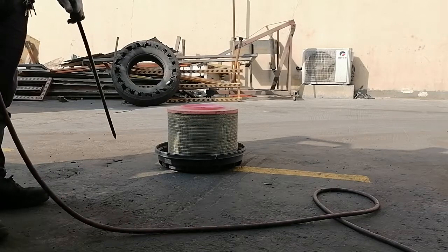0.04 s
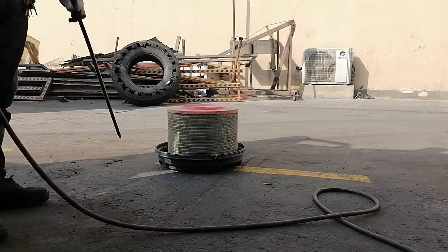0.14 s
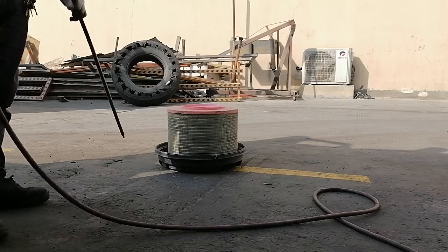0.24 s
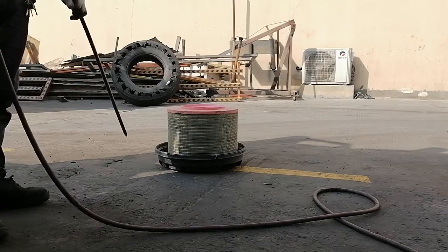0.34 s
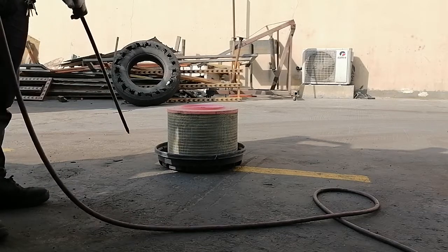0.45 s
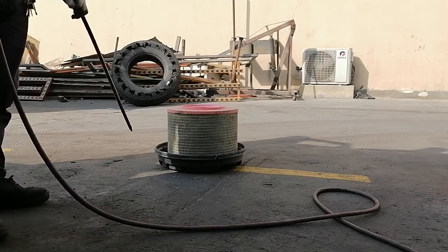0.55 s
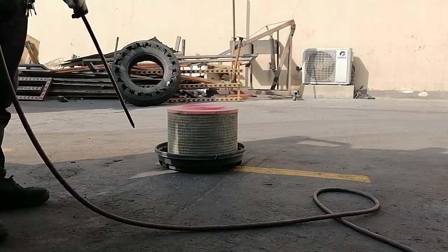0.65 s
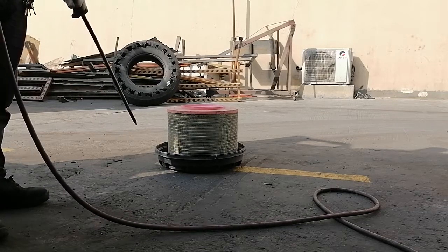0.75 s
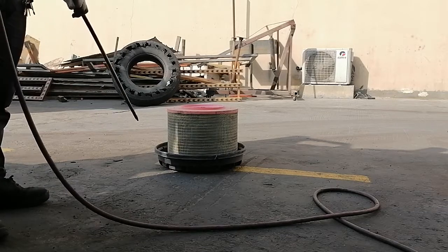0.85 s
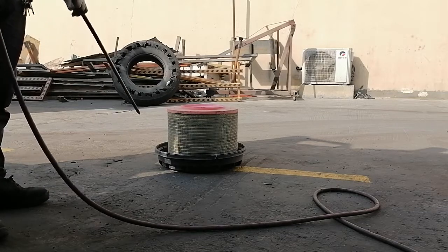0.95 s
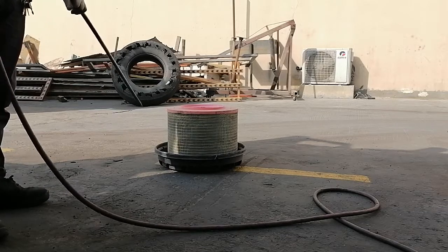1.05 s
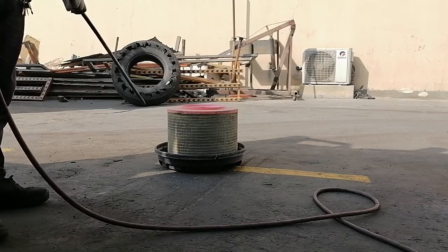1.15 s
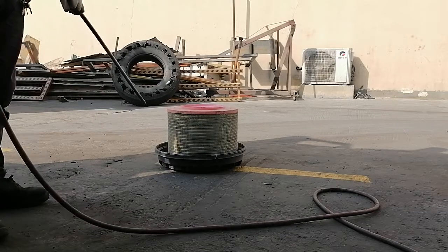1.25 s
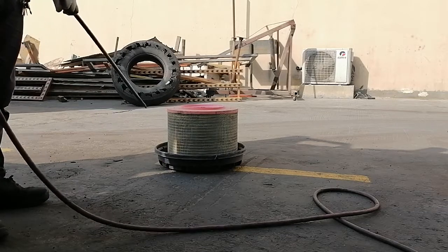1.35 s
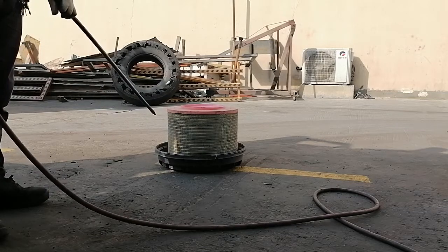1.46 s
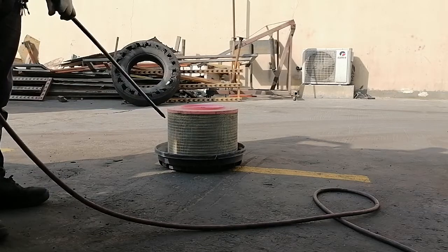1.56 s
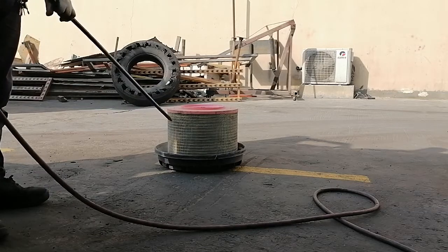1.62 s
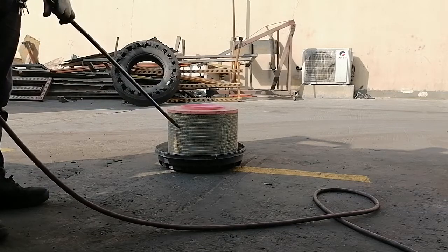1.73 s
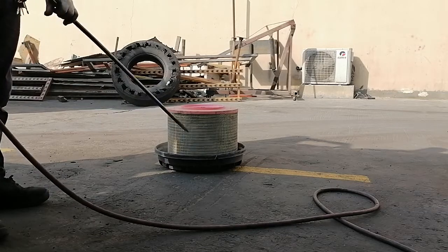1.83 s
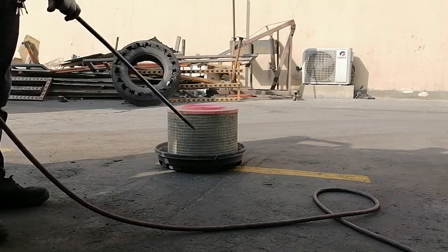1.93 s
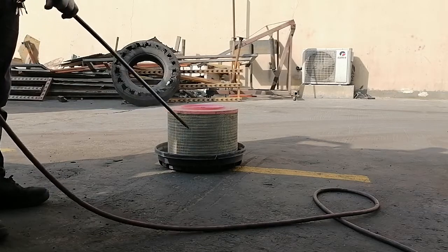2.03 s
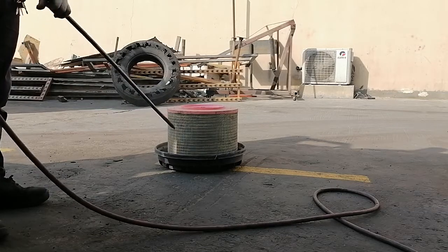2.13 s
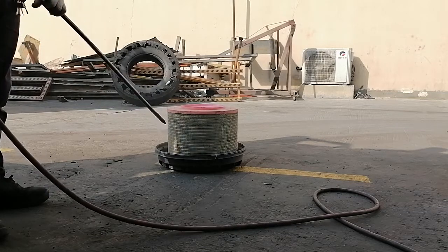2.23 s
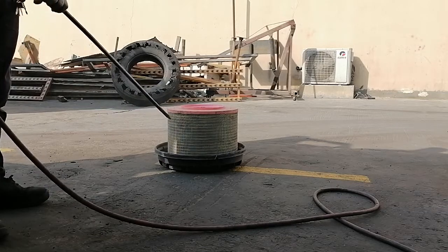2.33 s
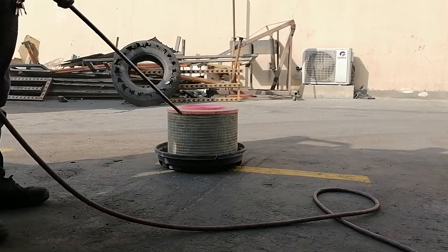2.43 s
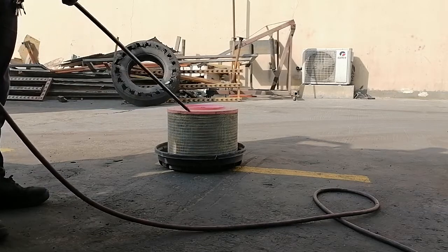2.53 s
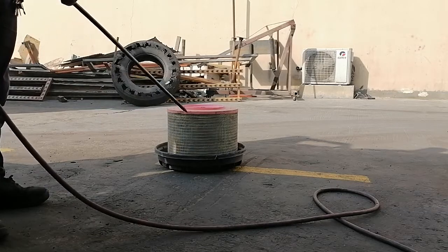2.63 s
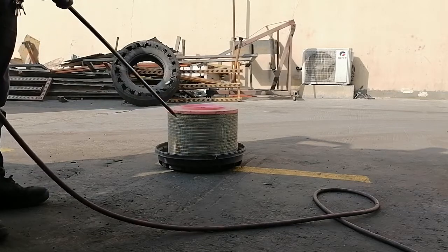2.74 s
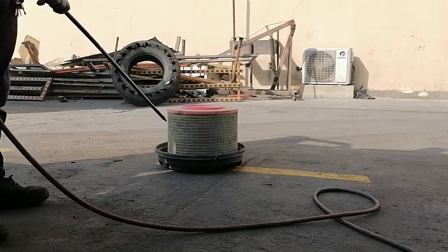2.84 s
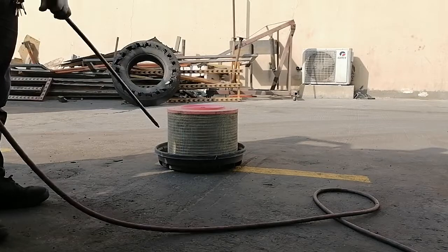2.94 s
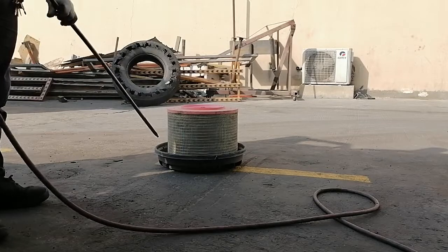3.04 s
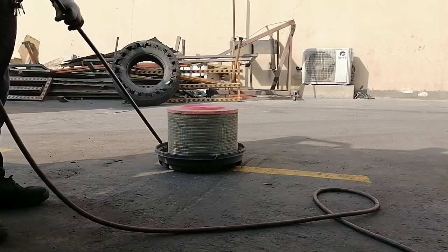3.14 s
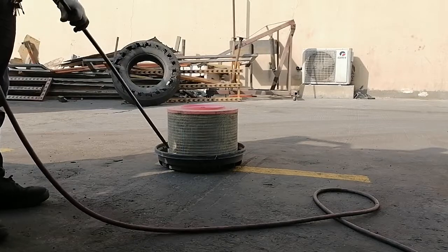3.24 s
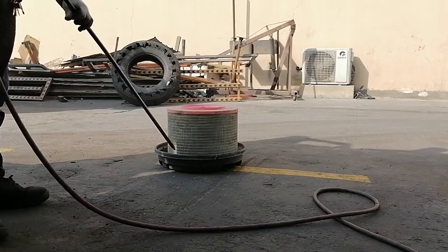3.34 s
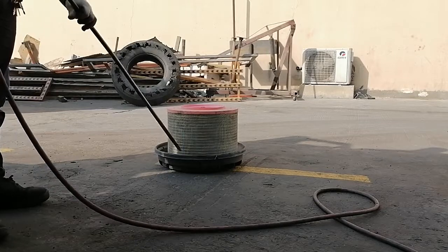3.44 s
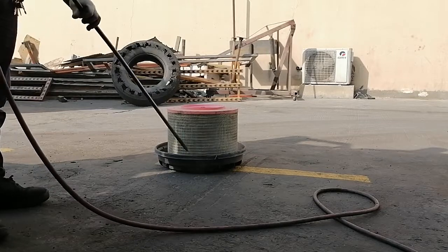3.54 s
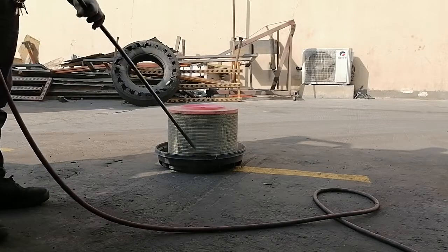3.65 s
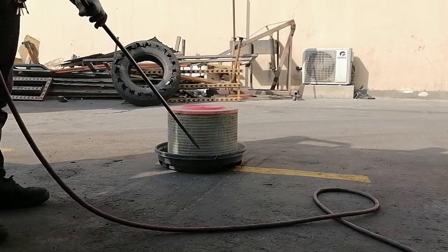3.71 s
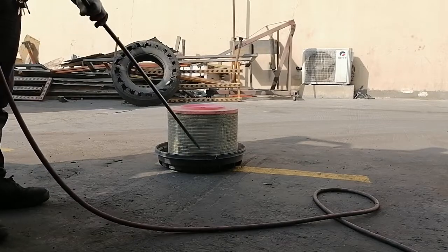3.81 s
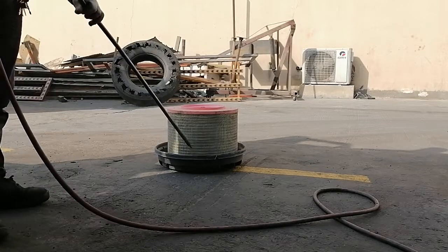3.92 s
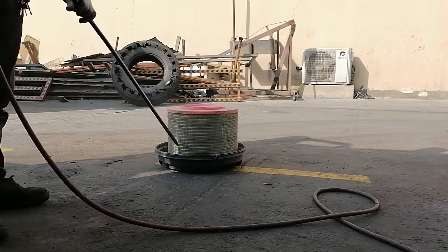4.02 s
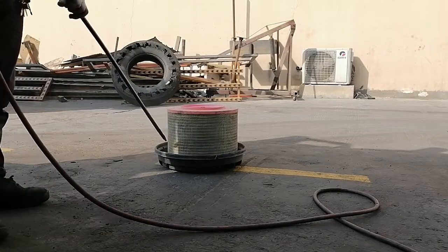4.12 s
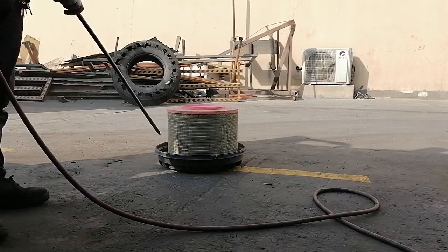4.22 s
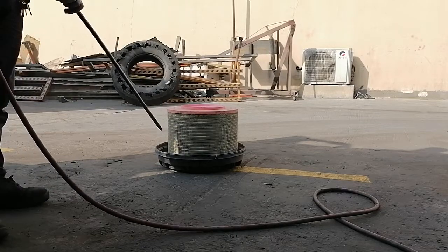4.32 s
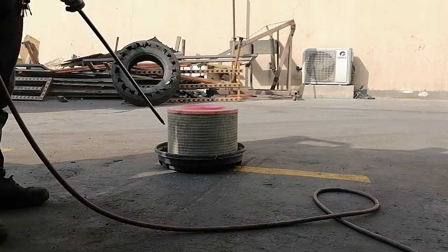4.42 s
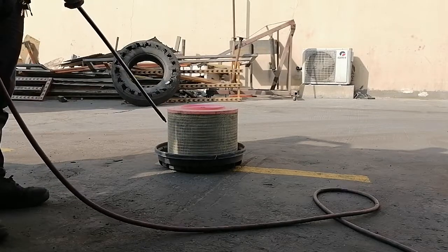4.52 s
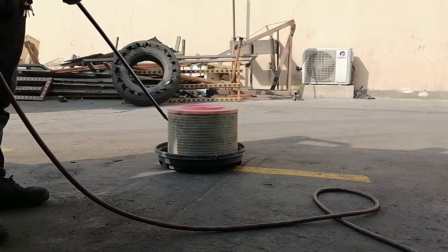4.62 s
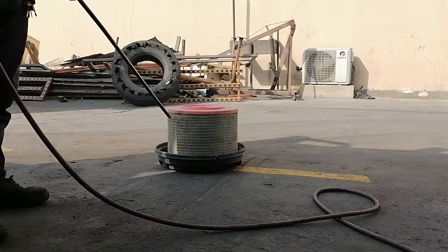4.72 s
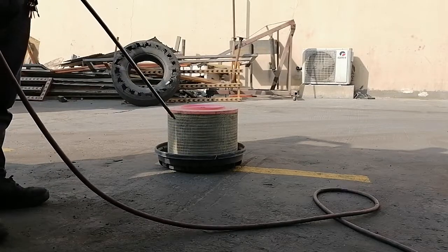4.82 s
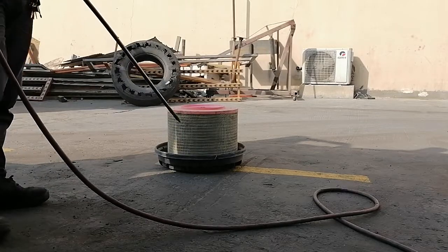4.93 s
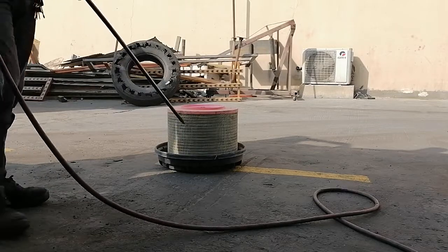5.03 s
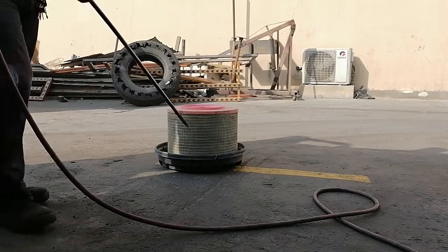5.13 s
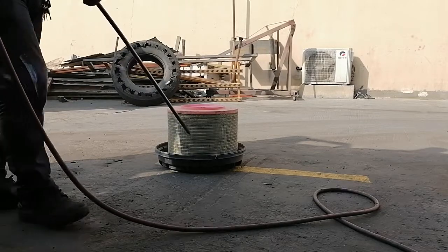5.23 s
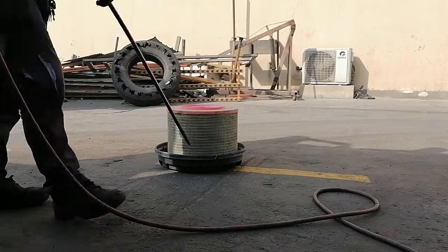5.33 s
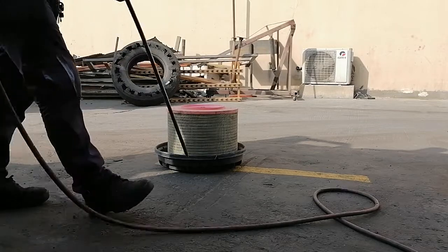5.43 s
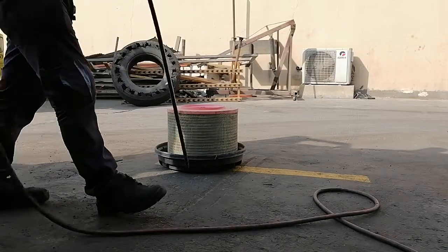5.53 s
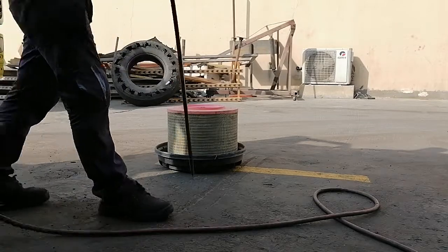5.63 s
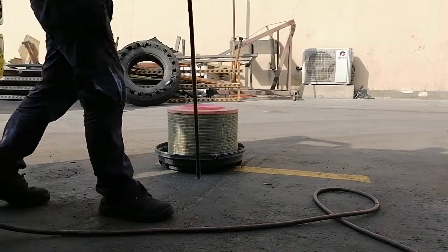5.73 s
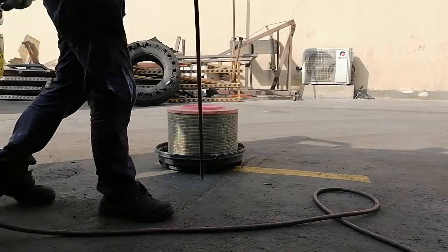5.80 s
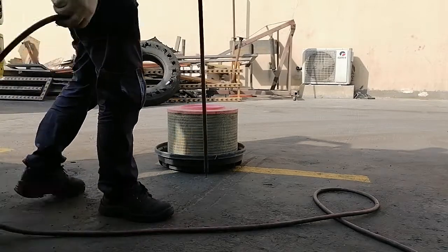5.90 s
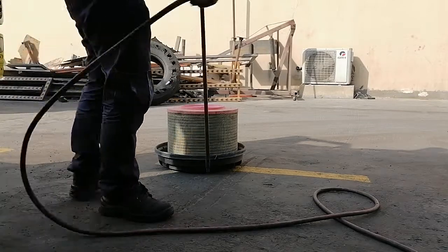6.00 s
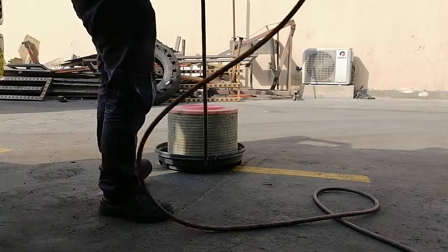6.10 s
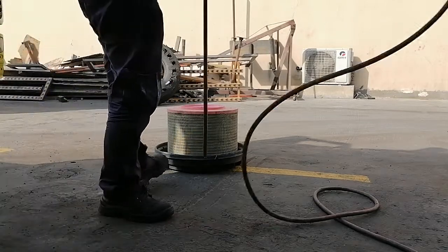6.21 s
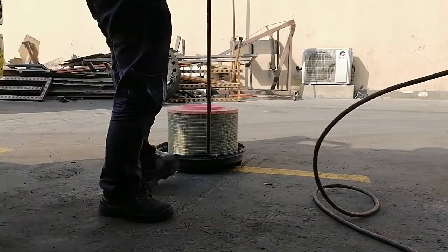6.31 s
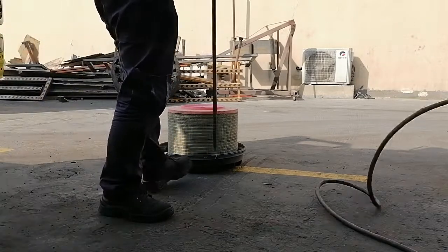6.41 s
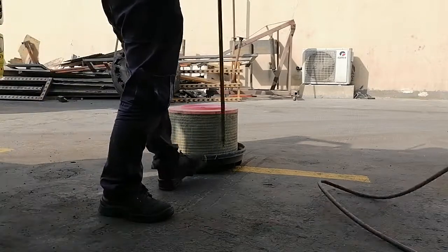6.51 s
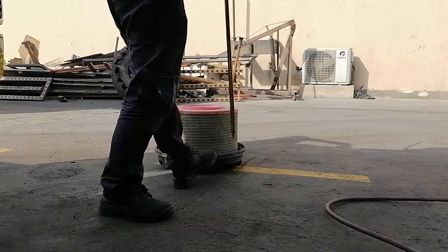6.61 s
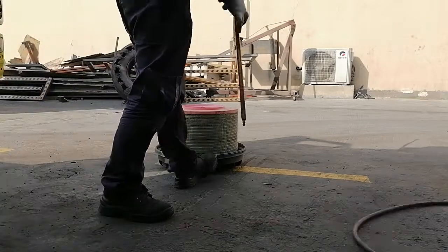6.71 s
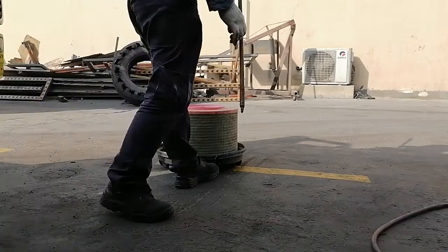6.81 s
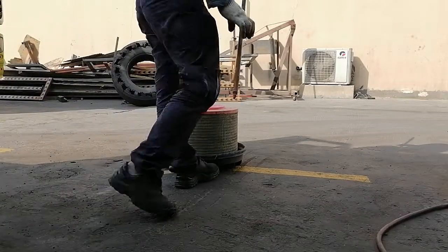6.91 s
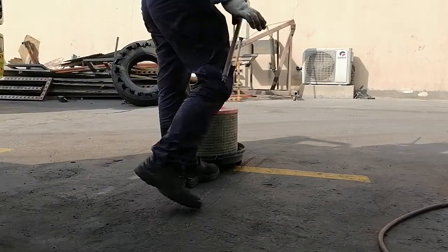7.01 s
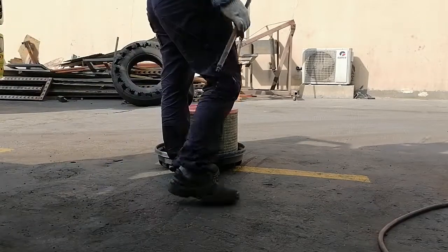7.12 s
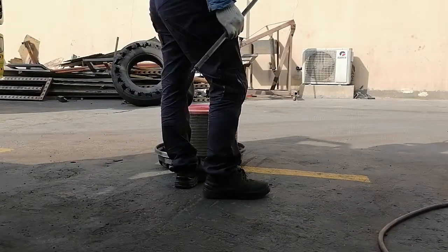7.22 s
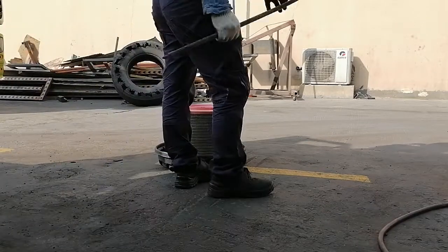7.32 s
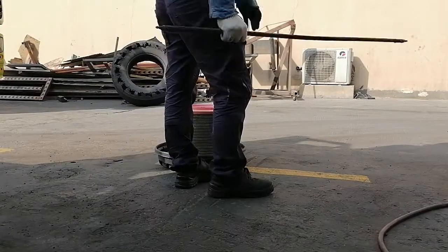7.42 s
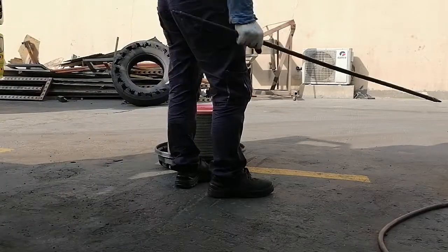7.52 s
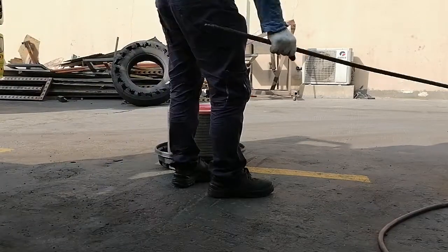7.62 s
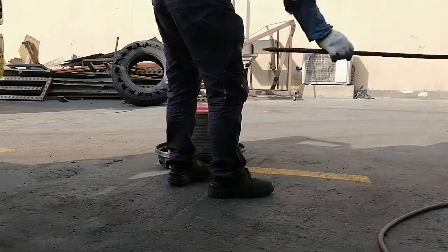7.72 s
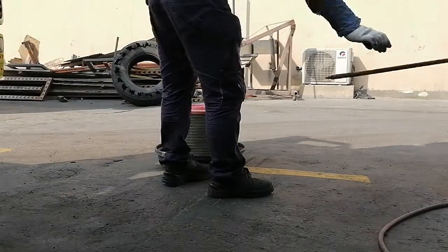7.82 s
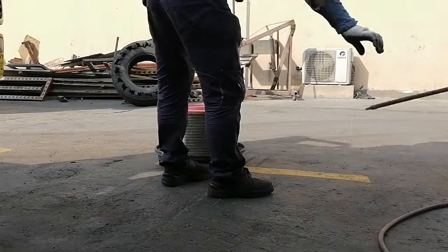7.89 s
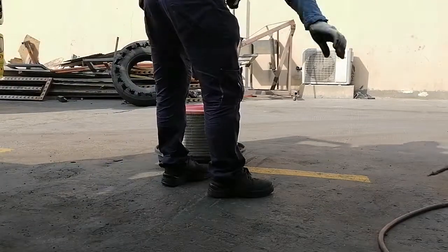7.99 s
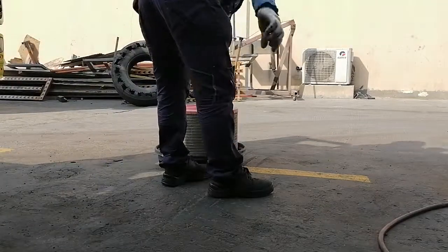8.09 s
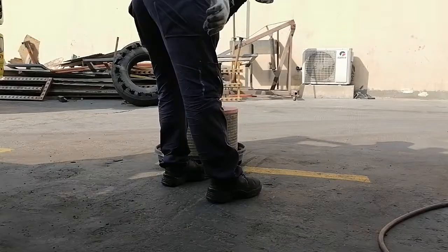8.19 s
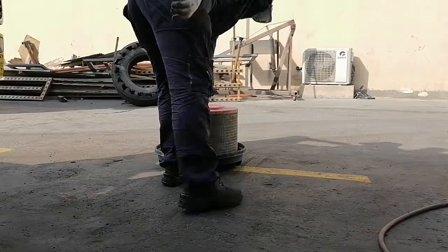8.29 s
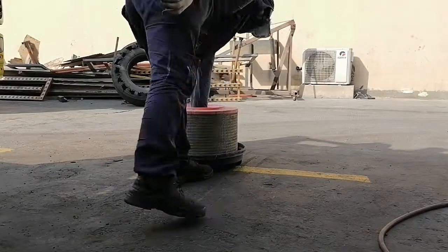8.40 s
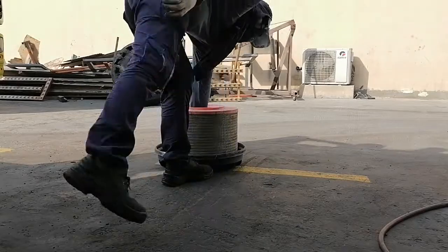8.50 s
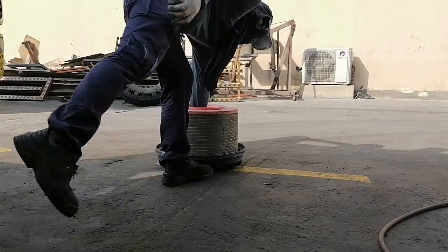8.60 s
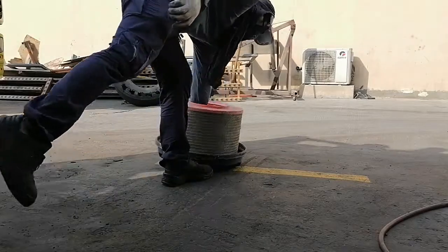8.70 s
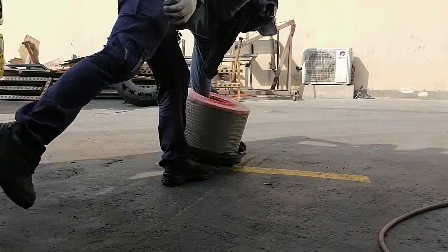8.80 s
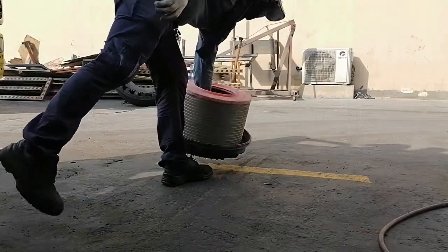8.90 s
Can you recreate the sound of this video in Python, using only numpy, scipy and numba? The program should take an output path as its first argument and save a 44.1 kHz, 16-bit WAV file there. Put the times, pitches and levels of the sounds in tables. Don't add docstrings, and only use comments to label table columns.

```python
import sys
import numpy as np
from scipy import signal
from scipy.fft import rfft, irfft, next_fast_len
from scipy.io import wavfile
from scipy.ndimage import uniform_filter1d, map_coordinates
from numba import njit

SR = 44100
rng = np.random.default_rng(int(sys.argv[2]) if len(sys.argv) > 2 else 0)


def int16_out(signal):
    q = np.round(np.clip(np.atleast_2d(signal).T, -1, 1) * 32767)
    wavfile.write(sys.argv[1], SR, q.astype(np.int16))


def volts_from_decibels(level):
    exponent = np.asarray(level, float) / 20
    return 10 ** exponent


N = 394689
T = np.arange(N) / SR
PORT_BALANCE = volts_from_decibels(np.array([[0.7], [-0.7]]))
PORT_HZ, PORT_WIDTH_HZ = 7230, 1500


def columns(table):
    s, *rest = np.transpose(table)
    return [np.interp(T, s, column) for column in rest]


def unit(x):
    return x / np.sqrt(np.mean(x ** 2))


def noise(spectrum, channels=1):
    hz, db = np.transpose(spectrum)
    size = next_fast_len(N)
    f = np.fft.rfftfreq(size, 1 / SR) + 1
    gain = volts_from_decibels(np.interp(np.log(f), np.log(hz), db, left=-80, right=-80))
    white = rng.standard_normal((channels, size))
    return unit(irfft(rfft(white) * gain, size)[:, :N])


def walk(rate):
    k = int(SR / rate)
    held = np.repeat(rng.standard_normal(N // k + 1), k)
    return 1.3 * uniform_filter1d(uniform_filter1d(held, k), k)[:N]


def ports(x, lag):
    size = next_fast_len(N + 64)
    turn = np.exp(-1j * np.pi * np.fft.rfftfreq(size) * lag)
    return irfft(rfft(x, size) * np.array([turn, 1 / turn]), size)[:, :N]


def spread(spectrum, like, lag):
    like = np.clip(like, 0, 1)
    n = noise(spectrum, channels=3)
    return np.sqrt(like) * ports(n[0], lag) + np.sqrt(1 - like) * n[1:]


def swell(s, length):
    return np.exp(-2 * ((T - s) / length) ** 2)


def fade(s, t60, rise=0.00018):
    age = np.maximum(T - s, 0)
    return (1 - np.exp(-age / rise)) * np.exp(-np.log(1000) * age / t60)


@njit
def svf(x, hz, share):
    y, b, l = np.empty(len(x)), 0., 0.
    for i in range(len(x)):
        g = np.tan(np.pi * hz[i] / SR)
        v = (b + g * (x[i] - l)) / (1 + g * (g + share))
        b, l, y[i] = 2 * v - b, l + 2 * g * v, share * v
    return y


def band(x, hz, width):
    centre = np.full(N, 1. * hz)
    return svf(svf(x, centre, width / hz), centre, width / hz)


# (time [s], hold [s], depth [dB], recovery [s])
DUCKS = [
    (1.168, 4.04, -9.5, 0.035),
    (6.775, .08, -9.5, 0.17),
    (7.453, 0.054, -14, 0.26),
    (8.056, 0.048, -11, 0.089),
]
DUCK_ATTACK_S = 0.055


def ducking():
    total = 0
    for s, hold, db, recovery in DUCKS:
        attack = np.clip((T - s) / DUCK_ATTACK_S, 0, 1)
        total = total + db * attack * np.exp(-np.maximum(T - s - hold, 0) / recovery)
    return total


# (frequency [Hz], density [dB])
YARD_SPECTRUM = [(12, -36), (20, -7.5), (38, 0.5), (111, -4.5), (168, -3), (228, -10), (265, -5),
                 (309, -11), (877, -22.5), (978, -23), (1110, -24), (1920, -27.5), (3600, -38), (4680, -79),
                 (7920, -120)]
# (frequency [Hz], level under the drone [dB])
HUM_TONES = [(41, -6), (59, -22), (84, -9), (143, -23), (177, -13.5), (263, -9.5)]
# (frequency [Hz], density [dB])
LEAK_SPECTRUM = [(2200, -17.5), (2900, -10.5), (3400, -12.5), (3950, -18), (4300, -11.5), (4800, -9),
                 (5150, -2.5), (5700, -19), (6300, -8.5), (7600, -7.5), (8500, -16.5), (10500, -23),
                 (13000, -30), (14700, -29), (15400, -31)]
# (frequency [Hz], level under the leak [dB])
LEAK_WHINE = [(4490, -7.5), (1090, -13)]
# (time [s], length [s], drone level [dB], upper level [dB])
DRONE_SWELLS = [(3.084, 0.073, 11, 9), (3.49, 0.57, 4, 4.5), (4.36, 0.15, 4, 12), (5.366, 0.27, 7, 0),
                (8.02, 0.054, 6, 0.5), (8.465, 0.11, 3, 5.5), (8.98, 0.4, 7.5, 13)]
DRONE_DB, UPPER_DB, LEAK_DB = -53, -5, -67
UPPER_DUCK, LEAK_DUCK = 0.89, 0.64


def yard():
    duck_db = ducking()
    drone_db = DRONE_DB + duck_db
    upper_db = DRONE_DB + UPPER_DB + UPPER_DUCK * duck_db
    for s, length, low_swell_db, high_swell_db in DRONE_SWELLS:
        drone_db = drone_db + low_swell_db * swell(s, length)
        upper_db = upper_db + high_swell_db * swell(s, length)
    low = [p for p in YARD_SPECTRUM if p[0] < 210] + [(230, -10.5)]
    high = [(180, -23)] + [p for p in YARD_SPECTRUM if p[0] >= 210]
    hum = 0
    for hz, db in HUM_TONES:
        unsteady_time = T + 0.0018 * walk(3)
        hum = hum + volts_from_decibels(db + 2.3 * walk(3.9)) * np.sin(2 * np.pi * hz * unsteady_time)
    drone = volts_from_decibels(drone_db) * (volts_from_decibels(-0.5 + 2.7 * walk(9.9)) * spread(low, 0.89, 4) + hum)
    upper = volts_from_decibels(upper_db + 1.0 + 1.0 * walk(6.1)) * spread(high, 0.62, 7.4)
    whine = 0
    for hz, db in LEAK_WHINE:
        tone = np.sin(2 * np.pi * hz * (T + 2e-5 * walk(30)))
        whine = whine + volts_from_decibels(db + 0.97 * walk(9.9)) * ports(tone, 3.0)
    leak_db = LEAK_DB + 3.5 + LEAK_DUCK * duck_db + 0.97 * walk(2.94)
    leak = volts_from_decibels(leak_db) * (spread(LEAK_SPECTRUM, 0.043, 7.1) + whine)
    return PORT_BALANCE * (drone + upper) + leak


# (time [s], peak level [dB], low knock share [dB], lag of left [samples])
CLICKS = [
    (.806, -54, 3, -1),
    (0.838, -52, 4, -1.5),
    (.923, -37, -5, -1.5),
    (5.092, -35, -3, 8.5),
    (5.186, -44, -4, 6),
    (6.762, -52, -8, 16),
    (7.746, -42, -8, 18),
]
# (frequency [Hz], width [Hz], level [dB])
KNOCK_BANDS = [(2480, 1200, 7), (6050, 4500, 7)]


def clicks():
    white, out = rng.standard_normal(N), 0
    snap = np.sin(2 * np.pi * PORT_HZ * T) + 0.35 * unit(band(white, PORT_HZ, PORT_WIDTH_HZ))
    knock = unit(sum(volts_from_decibels(db) * band(white, hz, width) for hz, width, db in KNOCK_BANDS))
    for s, db, low_db, lag in CLICKS:
        tick = snap * fade(s, 0.021, 0.00037) + volts_from_decibels(low_db) * knock * fade(s, 0.029, 0.00044)
        out = out + volts_from_decibels(db) * ports(tick, lag)
    return out


SCUFF_S = [5.42, .97, 6.71, 7.18, 7.26, 8.88]
# (length [s], level [dB], centre [Hz], width [Hz])
SCUFFS = [(0.27, -58, 378, 200), (0.077, -64, 5600, 700), (0.09, -72, 12700, 11000),
          (0.043, -62.5, 2400, 4400), (0.038, -62, 1700, 2300), (0.6, -49, 1960, 2700)]


def scuffs():
    out = 0
    for s, (length, db, hz, width) in zip(SCUFF_S, SCUFFS):
        grit = np.array([unit(band(n, hz, width)) for n in rng.standard_normal((2, N))])
        out = out + volts_from_decibels(db + 4.5 * walk(60)) * grit * swell(s, length)
    return out


def ground_reflection(x, path_ms):
    late = np.arange(N) - path_ms * SR / 1000
    copy = np.array([map_coordinates(c, [late], order=3) for c in x])
    dull = signal.filtfilt(*signal.butter(1, 6000, fs=SR), copy)
    return x + (path_ms / 0.39) ** 2 * (0.2 * copy + 0.72 * dull)


# (frequency [Hz], density [dB])
LOW_HISS = [(1000, -15.5), (1700, -17.5), (2010, -9.5), (2860, 0), (3250, -0.5), (3810, -5.5), (5250, 1.5),
            (5600, -25), (7280, -49), (12300, -120)]
CORE = [(2820, -21), (4800, -16), (5260, -3.5), (6280, -3.5), (7230, 5), (8210, 3), (9190, -11),
        (10200, -33), (13300, -53), (22000, -120)]
TOP_HISS = [(5530, -12.5), (9400, -1.5), (10000, -0.5), (13800, -4.5), (14800, -2.5), (15400, -6),
            (15900, -21)]
# (time [s], jet level [dB], extra ground path [ms], treble by nozzle angle [dB])
SWEEP = [(1.19, -41.5, 0.26, -3.5), (1.55, -41, 0.3, -3.5), (1.62, -42, 0.32, 1.5), (1.69, -43, 0.31, 0),
         (1.85, -37.5, 0.21, -7), (2.02, -37, 0.2, -6.5), (2.3, -40, 0.22, -3.5), (2.36, -38.5, 0.32, -2.5),
         (2.5, -42.5, .4, 0), (2.68, -41, 0.4, -3), (2.88, -42, 0.27, -3.5), (2.97, -47, 0.24, -1),
         (3.2, -46, 0.16, -2.5), (3.62, -42, 0.16, -10), (3.85, -40, 0.16, -9.5), (4.12, -47, .19, -4),
         (4.55, -44, 0.27, 0.5), (5.05, -39.5, 0.31, -4)]
# (time [s], length [s], roar level [dB], centre [Hz])
PLEATS = [(1.523, 0.098, -50.5, 576), (2.023, 0.21, -55.5, 920), (2.28, 0.096, -55.5, 880),
          (3.033, 0.16, -47.5, 690), (3.195, 0.16, -41, 980), (3.557, 0.3, -54, 920),
          (3.82, 0.11, -45.5, 830), (4.153, 0.094, -56, 1000), (4.268, 0.19, -43.5, 710),
          (4.614, 0.29, -66, 870)]
# (time [s], length [s], level [dB])
RIM = [(1.33, 0.3, 1), (1.583, 0.058, 8.5), (1.807, 0.092, 7), (2.06, 0.085, 4), (2.213, 0.27, 9.5),
       (2.89, 0.12, 9), (3.24, 0.2, 10), (3.856, 0.1, 3), (4.133, .06, 4.5), (4.58, 0.43, 8.5)]
# (time [s], length [s], level [dB])
HIDDEN = [(2.451, 0.059, -8), (2.726, 0.069, -7.5), (4.895, 0.093, -2.5)]
OPEN_S, OPENING_S, SHUT_S = 1.1785, 0.006, 5.084
DRAIN_DB_PER_S, EDGES_DRAIN_DB_PER_S = 218, 106
LOW_HISS_DB, ROAR_FLOOR_DB = -10.5, -81.5


def jet():
    core_db, path_ms, top_db = columns(SWEEP)
    shut = np.maximum(T - SHUT_S, 0)
    valve = np.clip((T - OPEN_S) / OPENING_S, 0, 1) * volts_from_decibels(-DRAIN_DB_PER_S * shut)
    hidden_db = sum(db * swell(s, length) for s, length, db in HIDDEN)
    rim_db = sum(db * swell(s, length) for s, length, db in RIM)
    core_db = core_db + hidden_db
    low_db = LOW_HISS_DB + rim_db - EDGES_DRAIN_DB_PER_S * shut
    top_db = top_db - 0.33 * hidden_db - EDGES_DRAIN_DB_PER_S * shut
    eddies_db = 0.8 * walk(12) + 0.67 * walk(190)
    hiss = volts_from_decibels(5.5 + 0.45 * walk(24.14)) * spread(CORE, 0.47, -3.04)
    hiss += volts_from_decibels(low_db + 0.41 * walk(21.47)) * spread(LOW_HISS, 0.56, -2.5)
    hiss += volts_from_decibels(top_db + 4.5 + 1.2 * walk(26.63)) * spread(TOP_HISS, 0.4, -2.47)
    roar_hz = columns([(s, hz) for s, _, _, hz in PLEATS])[0]
    rush = spread([(200, -1.0), (2600, -2.5)], 0.87, -3.5)
    hollow = np.array([svf(svf(n, roar_hz, 0.75), roar_hz, 2.0) for n in rush])
    drive = volts_from_decibels(ROAR_FLOOR_DB) + sum(volts_from_decibels(db) * swell(s, length) for s, length, db, _ in PLEATS)
    roar = drive * volts_from_decibels(0.3 * walk(30.4)) * unit(hollow)
    direct = volts_from_decibels(core_db + eddies_db - 1.0) * hiss + volts_from_decibels(-0.5) * roar
    return valve * PORT_BALANCE * ground_reflection(direct, path_ms)


def ring(s, hz, gain, t60, stop=9., rise_ms=0.93, since=0., lean_db=0., skew=0.):
    i = int(s * SR)
    longest_s = min(2 / 3, t60.max(), np.max(stop) - s + 0.04)
    age = T[i:i + int(SR * longest_s)] - s
    turn, left, right = rng.uniform(size=(3, len(hz), 1))
    chatter = 0.35 * np.sin(2 * np.pi * ((7 + 12 * left) * age + right))
    phase = 2 * np.pi * hz[:, None] * (age + since) + chatter
    rise = np.clip(age * 1000 / rise_ms, 0, 1)
    damped = np.exp(-np.maximum(age + s - stop, 0) / 0.0029)
    life = rise * damped * gain[:, None] * np.exp(-np.log(1000) * age / t60[:, None])
    out = np.zeros((2, N))
    for c, (start, side) in enumerate(((left, 0.5), (right, -0.5))):
        slow = 0.25 * np.sin(2 * np.pi * ((4 + 12 * turn) * age + start))
        fast = 0.2 * np.sin(2 * np.pi * ((17 + 20 * start) * age + turn))
        waver = (1 + slow + fast) * volts_from_decibels(side * lean_db)
        out[c, i:i + len(age)] = np.sum(life * waver * np.sin(phase + side * skew), axis=0)
    return out


def overtones(s, db, t60, low_hz=8300, count=24, tilt_db=20):
    place, size = rng.uniform(size=(2, count))
    hz = low_hz * (15300 / low_hz) ** place
    return ring(s, hz, volts_from_decibels(db - tilt_db * place - 10 * size), t60 * (1 - 0.5 * place))


def clank(hits, hz, modes, spectrum, high_db):
    db, t60 = np.transpose(modes)
    t60 = np.minimum(t60, 1.4)
    rattle, out = noise(spectrum)[0], 0
    crack = unit(band(rng.standard_normal(N), PORT_HZ, 1400))
    for s, crack_db, ring_db, rattle_db, rattle_t60 in hits:
        signs = rng.choice([-1, 1], size=len(hz))
        out = out + volts_from_decibels(ring_db) * ring(s, np.array(hz), signs * volts_from_decibels(db), t60)
        out = out + volts_from_decibels(rattle_db) * rattle * fade(s, rattle_t60, 0.00076)
        out = out + volts_from_decibels(crack_db) * crack * fade(s, 0.051)
    return out + overtones(hits[-2][0], high_db, 0.17)


# (time [s], crack [dB], ring [dB], rattle [dB], rattle t60 [s])
FITTING_HITS = [
    (6.78, -44, -33, -44.5, 0.21),
    (6.792, -45, -34, -59, 0.17),
    (6.803, -25, -14, -40.5, 0.12),
    (6.815, -28, -3, -41.5, 1),
]
FITTING_HZ = [565, 643, 1007, 1243, 1270, 1552, 2396, 2927, 3288, 4705, 5469, 6249, 7125, 7555, 8834, 11660,
              9800, 10700, 12700, 13650, 14800]
# (level [dB], t60 [s])
FITTING_MODES = [(-53, 1.6), (-49, 1.1), (-56, 1.12), (-48.5, 1.5), (-41.5, 0.91), (-44, 0.8), (-64, 0.78),
                 (-54, 0.82), (-52.5, 1.15), (-40, 0.58), (-52, 0.52), (-36, 0.38), (-36.5, 0.37),
                 (-50, 0.61), (-36, 0.34), (-45, 0.3), (-60, 0.25), (-62, .3), (-56, 0.31), (-60, 0.3),
                 (-59, 0.28)]
# (frequency [Hz], density [dB])
FITTING_RATTLE = [(210, -47), (350, -12.5), (632, -1), (870, -0.5), (3220, -8.5), (3540, -9.5), (4800, -8),
                  (5910, -22), (7270, -13), (8950, -27), (9390, -47), (12100, -42), (15900, -57)]


def fitting():
    return clank(FITTING_HITS, FITTING_HZ, FITTING_MODES, FITTING_RATTLE, high_db=-43)


# (time [s], length [s], level [dB],
# frequency [Hz])
PIPS = [(6.7645, 0.0027, -36, 7600), (6.795, .003, -29.5, 7600), (7.7474, 0.00067, -30.5, 7650),
        (7.749, 0.0011, -43, 8500), (6.8035, 0.0016, -26.5, 7500)]


def pips():
    return sum(volts_from_decibels(db) * swell(s, 2 * length) * np.sin(2 * np.pi * hz * T) for s, length, db, hz in PIPS)


# (time [s], crack [dB], ring [dB], rattle [dB], rattle t60 [s])
PLATE_HITS = [
    (7.479, -33, 3.5, -22.5, 0.052),
    (7.484, -25, -11, -52, 1),
]
PLATE_HZ = [1214, 1310, 1720, 2278, 3100, 3291, 3704, 4729, 5200, 5955, 6585, 6891, 7266, 7511, 7644, 8228]
# (level [dB], t60 [s])
PLATE_MODES = [(-51.5, 1.3), (-59, 1.2), (-45, 0.15), (-61, 0.7), (-58, 1.1), (-52.5, 0.79), (-62, 0.96),
               (-60, 0.43), (-66, 1.1), (-53, 1), (-61, 0.84), (-60, 0.63), (-54, 0.89), (-49, 0.87),
               (-58, 0.84), (-54, 0.63)]
# (frequency [Hz], density [dB])
PLATE_RATTLE = [(530, -72), (900, -31), (1220, -1.5), (1850, -13.5), (2220, -15), (2720, -8), (3220, -2.5),
                (4090, -17), (4560, -2), (7020, -6), (10600, -22), (14600, -24), (15900, -37)]


def plate():
    return clank(PLATE_HITS, PLATE_HZ, PLATE_MODES, PLATE_RATTLE, high_db=-37.5)


def next_contact(s, times):
    return min([t for t in times if t > s] + [9.])


# (time [s], crack level [dB], rise [ms])
BOUNCES = [
    (8.064, -37, 4),
    (8.171, -35, 7),
    (8.477, -34, 3),
]
LANCE_HZ = [557, 826, 833, 1137, 1161, 1497, 1535, 1913, 1958, 2341, 2424, 2843, 2936, 3380, 3486, 3975,
            4075, 4607, 4692, 5222, 5347, 5600, 5857, 6040, 6459, 6740, 7055, 7455, 7833, 8156]
# (level after first, second, third landing [dB], t60 [s])
LANCE_RING = [(-49, -56, -49, 2), (-49, -32.5, -33, 5.5), (-50, -45, -32, 2.5), (-43, -23, -21, 0.86),
              (-44.5, -42, -18, 0.83), (-41, -28, -38, 2.3), (-47, -40, -22, 1.4), (-41, -25.5, -30, 1.1),
              (-39.5, -47, -32, 2.5), (-60, -36.5, -54, 2.7), (-40, -34, -32.5, 2.8), (-37, -34, -42, 1.3),
              (-31, -37, -27.5, 1.6), (-41, -31, -54, 0.8), (-39, -40, -38, 0.82), (-37, -40, -54, 0.87),
              (-45, -53, -52, 1.2), (-52, -44, -64, 1.2), (-42, -47, -58, 0.8), (-69, -40, -47, 0.6),
              (-49, -60, -51, 1.2), (-62, -56, -59, 1.1), (-49, -46, -40, 0.7), (-67, -53, -38, 0.7),
              (-58, -55, -42, 0.54), (-41, -58, -38, 0.9), (-45, -41, -39, 0.54), (-39, -40, -49, 0.78),
              (-59, -54, -41, 0.45), (-65, -36, -61, 0.5)]
TOUCH_S = [8.243, 8.33, 8.519, 8.57, 8.655, 8.737, 8.825]
# (tap [dB], overtones [dB], low knock [dB])
TOUCHES = [(-52, -51, -73), (-62, -78, -73), (-52, -43, -44), (-58, -70, -41), (-59, -76, -55),
           (-56, -74, -55), (-49, -72, -58)]
LANCE_ROLL = [(-65, -62, -61, -52, -69, -49.5, -49), (-27.5, -31, -34, -31, -29.5, -49, -35),
              (-41, -38, -33.5, -33.5, -33.5, -40, -37.5), (-34.5, -41, -27, -37, -22.5, -48, -34.5),
              (-51, -32.5, -27, -28.5, -25.5, -30, -37), (-29, -33, -21, -35, -30, -40, -31),
              (-32, -31, -33, -24, -34, -34, -31), (-36, -35.5, -30, -41, -44, -39, -40),
              (-44, -47, -34, -30, -35, -34.5, -38), (-49, -53, -34, -33, -32, -37, -34),
              (-30, -38, -34.5, -38, -40, -37.5, -32.5), (-39.5, -47.5, -27.5, -32, -45, -40, -48),
              (-41, -47, -28.5, -30, -38, -47, -45), (-45, -47, -31, -41, -42, -43, -48),
              (-37.5, -49, -29, -29.5, -44, -49, -46), (-59, -57, -48, -61, -52, -49, -71),
              (-55, -63, -45, -54, -53, -53, -70), (-53, -62, -55, -59, -52, -60, -72),
              (-56, -69, -42, -46, -48, -54, -68), (-55, -64, -48, -58, -67, -64, -70),
              (-61, -58, -56, -59, -60, -63, -66), (-49, -63, -55, -59, -80, -77, -86),
              (-58, -64, -50, -49, -62, -59, -74), (-62, -71, -49, -56, -61, -70, -74),
              (-63, -82, -35, -51, -61, -56, -70), (-75, -73, -40, -50, -65, -73, -63),
              (-46, -67, -42, -58, -62, -61, -53)]
# (frequency [Hz], left minus right [dB])
LEAN = [(557, -14), (830, -4), (1150, 5), (1515, -3), (1930, -1), (2400, 3)]
SCATTER_HZ, SCATTER_DB, SCATTER_RAD = 1700, 6.5, 1.8
LAST_S, LAST_DB = 8.946, -45


def lance():
    hz, (*landing_db, t60) = np.array(LANCE_HZ), np.transpose(LANCE_RING)
    t60 = t60 * np.minimum(1, 4500 / hz)
    rolled = len(LANCE_ROLL)
    grit = noise([(500, -14.5), (2500, -12), (7500, -15.5), (9500, -17.5), (15500, -76)])[0]
    knock = unit(band(rng.standard_normal(N), 560, 200))
    landings = [b[0] for b in BOUNCES]
    contacts = landings + TOUCH_S
    apart = (hz > SCATTER_HZ)[:, None]
    lean_hz, lean_points_db = np.transpose(LEAN)
    usual_lean_db = np.interp(np.log(hz), np.log(lean_hz), lean_points_db, right=0)[:, None]

    def lean():
        return usual_lean_db + SCATTER_DB * apart * rng.standard_normal((len(hz), 1))

    out = volts_from_decibels(LAST_DB) * grit * fade(LAST_S, 0.05, 0.001)
    for (s, crack_db, ms), db in zip(BOUNCES, landing_db):
        signs = rng.choice([-1, 1], size=len(hz))
        skew = SCATTER_RAD * apart * rng.standard_normal((len(hz), 1))
        next_landing = next_contact(s, landings)
        stop = np.where(np.arange(len(hz)) < rolled, next_contact(s, contacts), next_landing)[:, None]
        out = out + ring(s, hz, signs * volts_from_decibels(db + 1.0), t60, stop, ms, 0., lean(), skew)
        out = out + volts_from_decibels(crack_db) * grit * (fade(s, 0.05, 0.002) + volts_from_decibels(-6) * fade(s, 0.8, 0.002))
        out = out + overtones(s, crack_db - 9, 0.35, low_hz=3625, count=90, tilt_db=22)
        for touch, roll_db, (tap_db, high_db, knock_db) in zip(TOUCH_S, np.transpose(LANCE_ROLL), TOUCHES):
            if not s < touch < next_landing:
                continue
            since = (int(touch * SR) - int(s * SR)) / SR
            out = out + ring(touch, hz[:rolled], signs[:rolled] * volts_from_decibels(roll_db - 0.5), t60[:rolled],
                             next_contact(touch, contacts), 6., since, lean()[:rolled], skew[:rolled])
            out = out + overtones(touch, high_db, 0.3) + volts_from_decibels(tap_db) * grit * fade(touch, 0.04, 0.0013)
            out = out + volts_from_decibels(knock_db) * knock * fade(touch, 0.06, 0.002)
    return out


@njit
def walls(x, lags, gain, damp):
    line, soft, out = np.zeros((8, 8192)), np.zeros(8), np.zeros((2, len(x)))
    for i in range(len(x)):
        total = 0.
        for k in range(8):
            soft[k] += (1 - damp) * (gain[k] * line[k, (i - lags[k]) & 8191] - soft[k])
            total += soft[k]
            out[k % 2, i] += soft[k]
        for k in range(8):
            line[k, i & 8191] = x[i] + 1e-18 + soft[k] - total / 4
    return out


YARD_T60_S, YARD_DAMP = 0.63, 0.3


def scene():
    fitting_sound, plate_sound, rod = fitting(), plate(), lance()
    near = jet() + clicks()
    lags = rng.integers(500, 3000, size=8)
    sent = volts_from_decibels(-11.5) * (fitting_sound + plate_sound)[0] + volts_from_decibels(-15.0) * rod[0] + volts_from_decibels(-16.5) * near[0]
    echo = walls(sent, lags, volts_from_decibels(-60 * lags / SR / YARD_T60_S), YARD_DAMP)
    metal = ports(fitting_sound, 16.73) + ports(pips(), 11.6) + ports(plate_sound, 21.45) + ports(rod, 17.14)
    return near + metal + echo + yard() + scuffs()


def top_cut(x):
    return signal.sosfilt(signal.butter(12, 16080, fs=SR, output="sos"), x)


def record(dry):
    mix = signal.sosfilt(signal.ellip(8, 0.2, 60, 15750, fs=SR, output="sos"), dry)
    return top_cut(mix)


dry = scene()
out = record(dry)
int16_out(out)
```